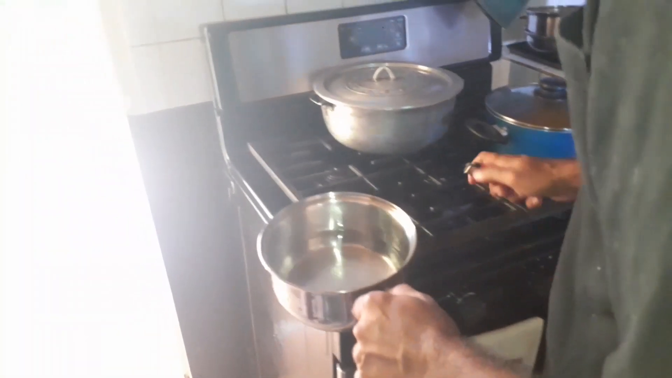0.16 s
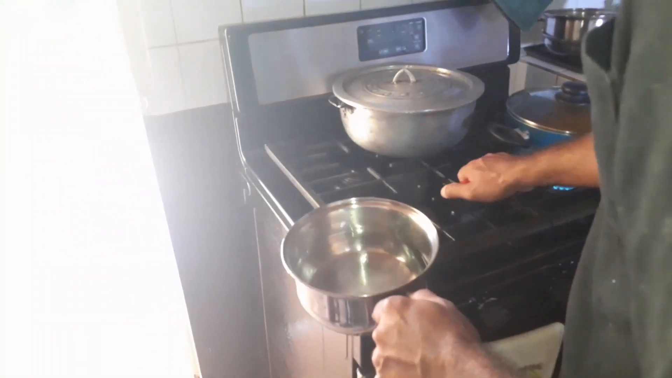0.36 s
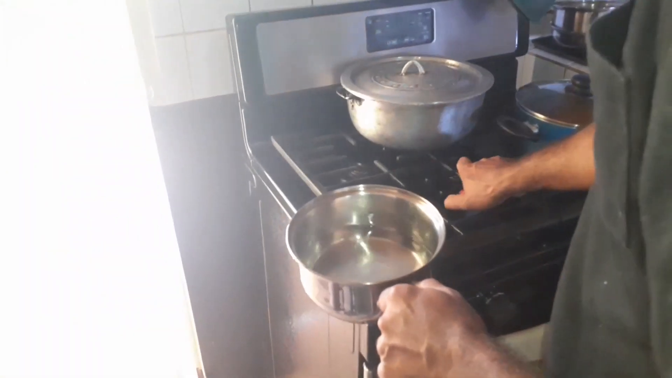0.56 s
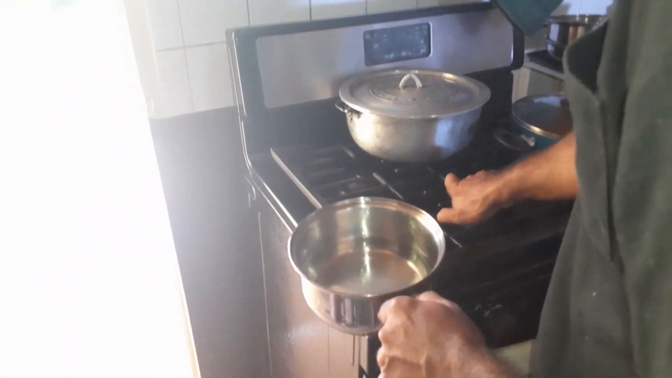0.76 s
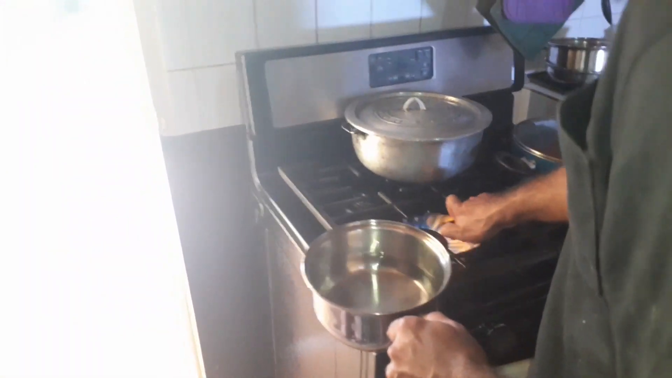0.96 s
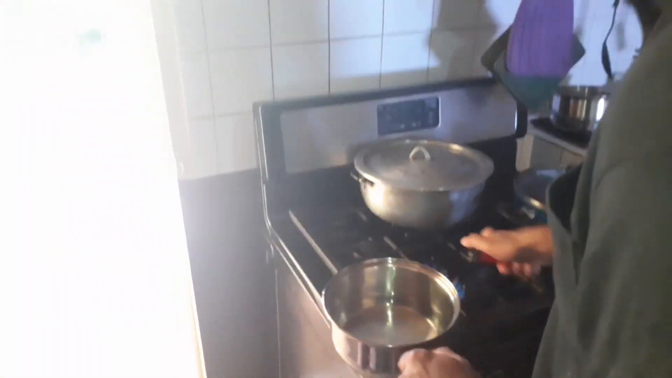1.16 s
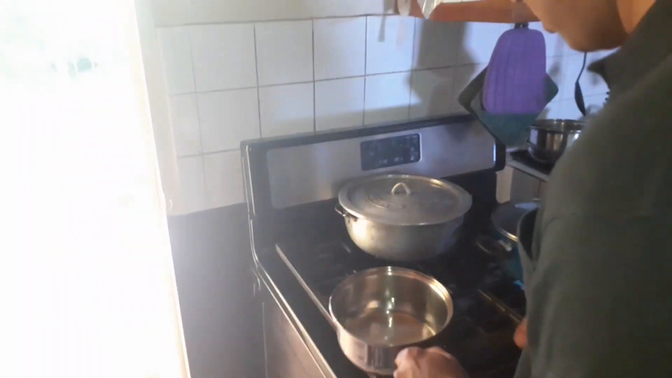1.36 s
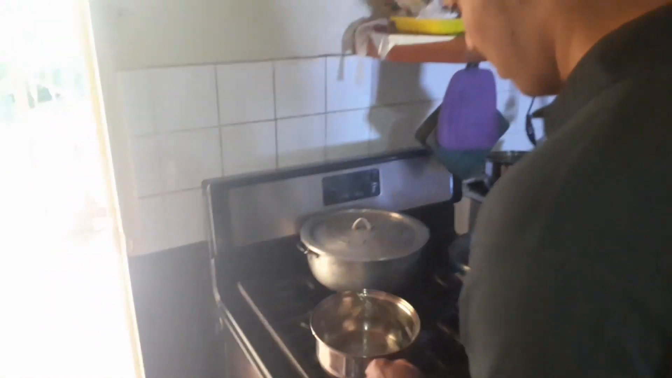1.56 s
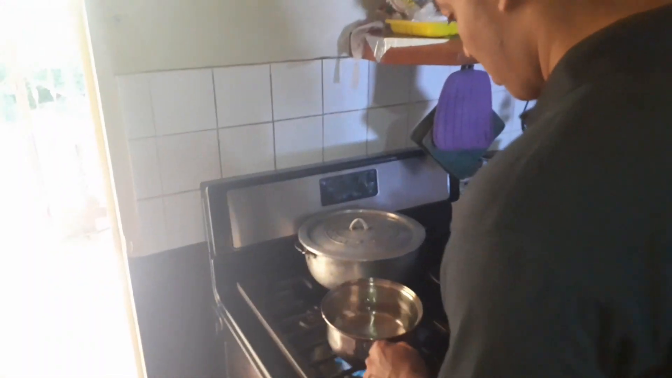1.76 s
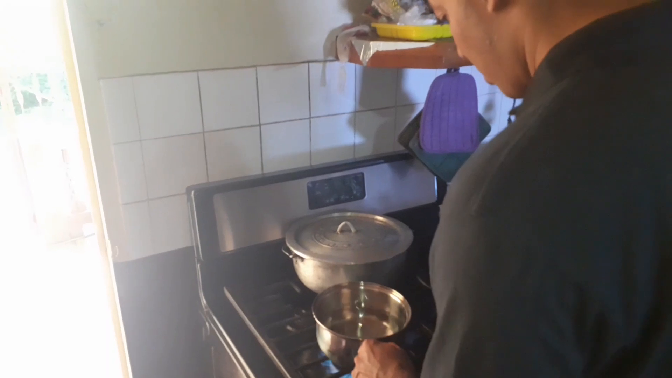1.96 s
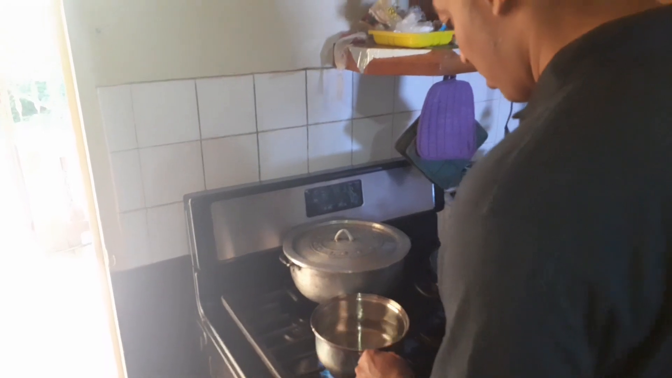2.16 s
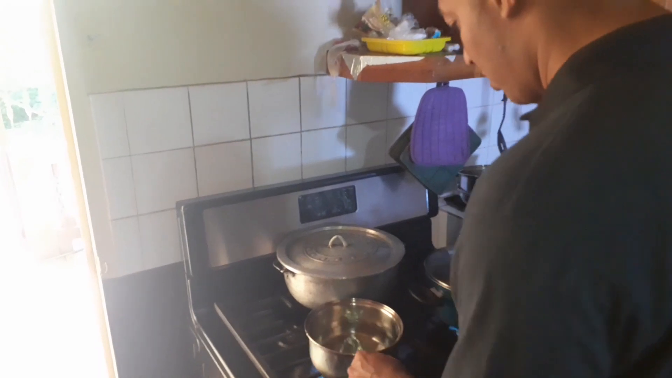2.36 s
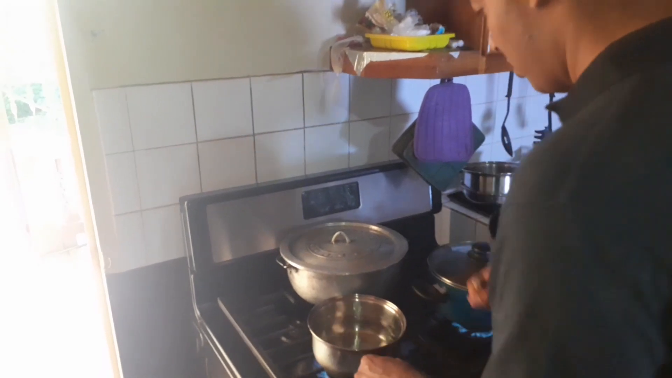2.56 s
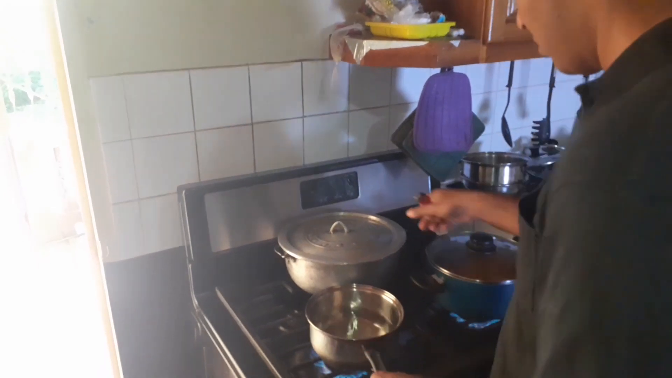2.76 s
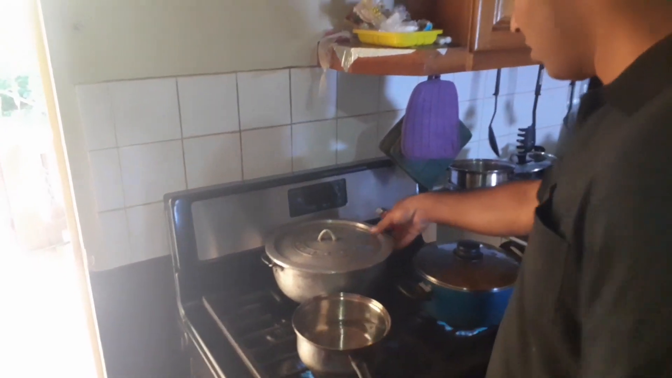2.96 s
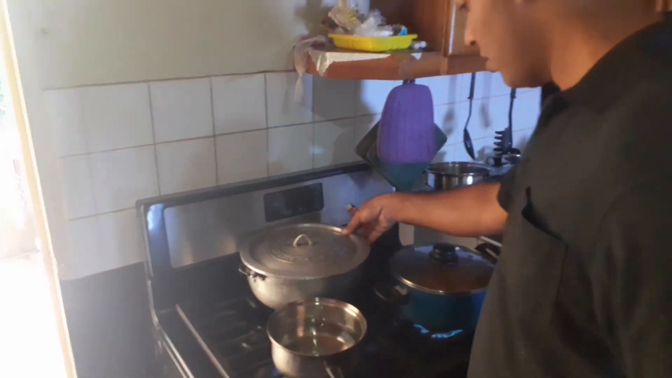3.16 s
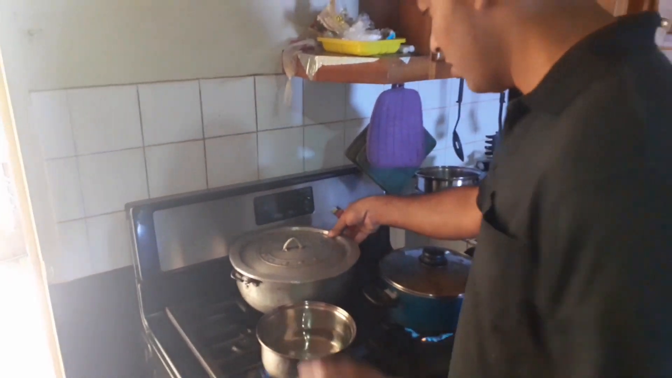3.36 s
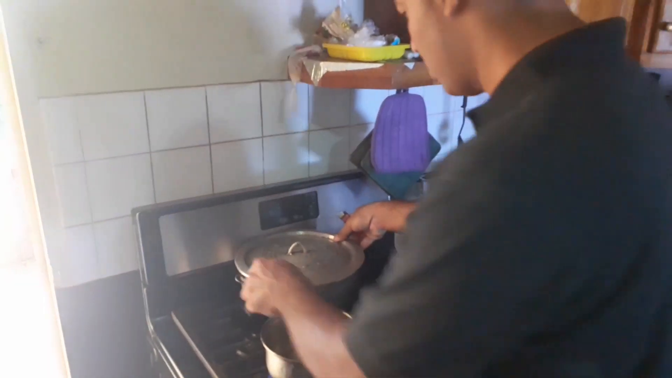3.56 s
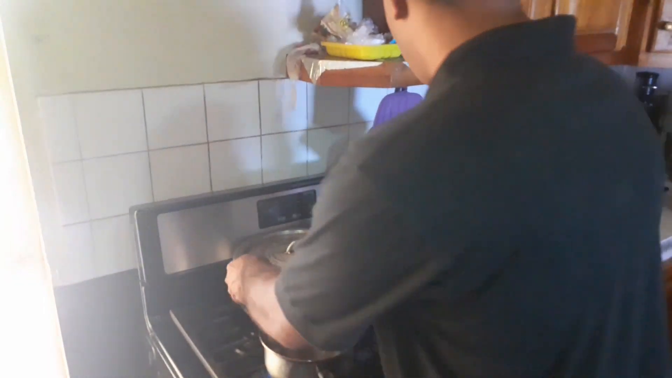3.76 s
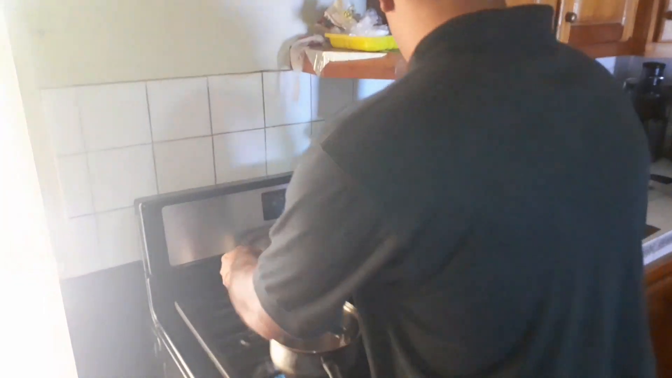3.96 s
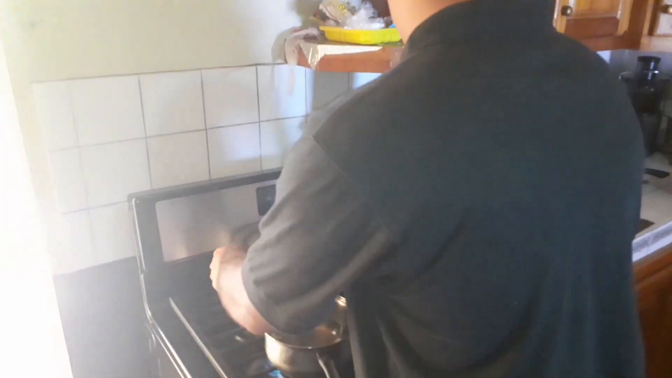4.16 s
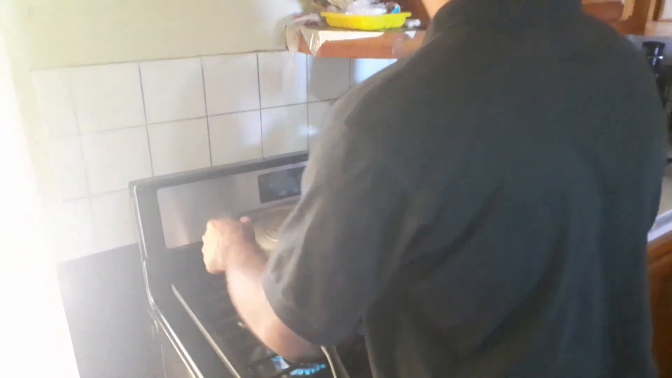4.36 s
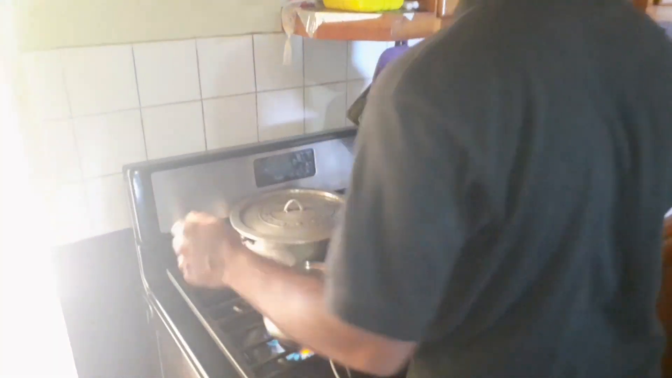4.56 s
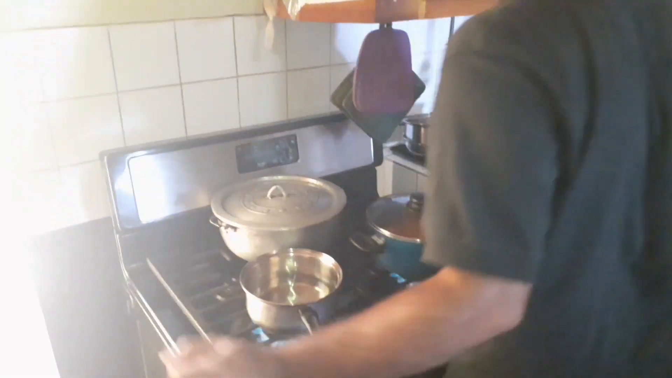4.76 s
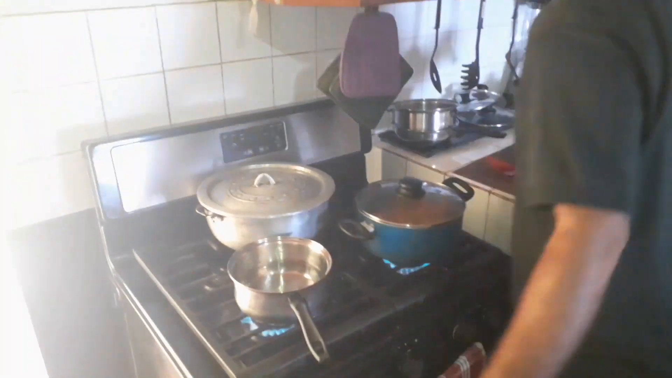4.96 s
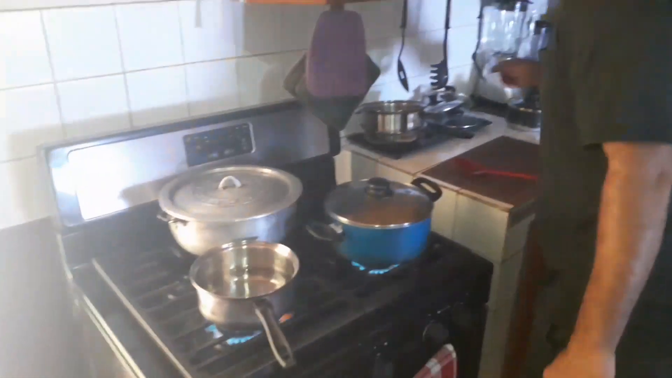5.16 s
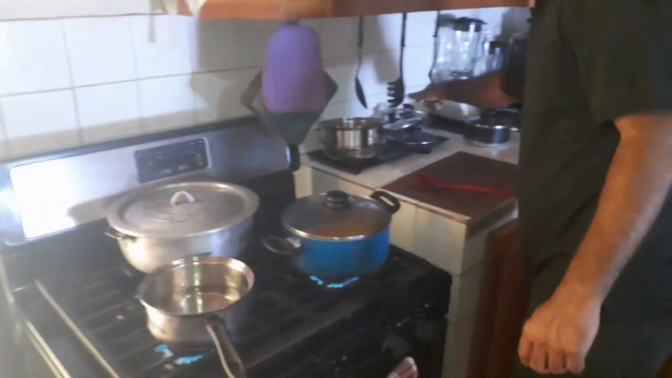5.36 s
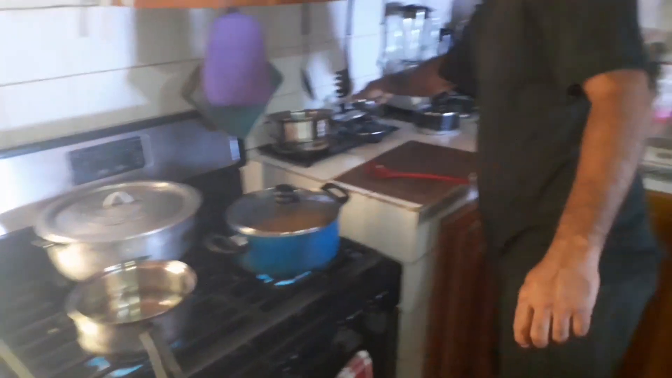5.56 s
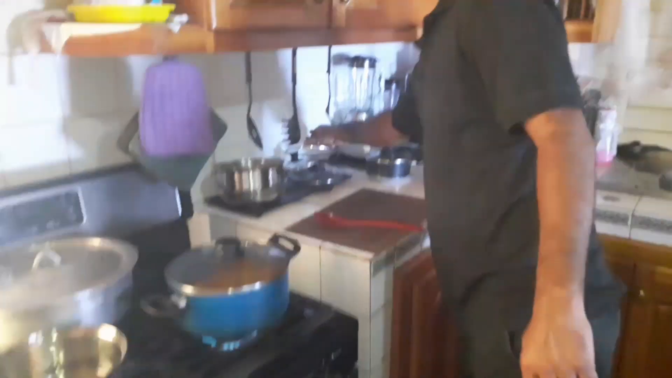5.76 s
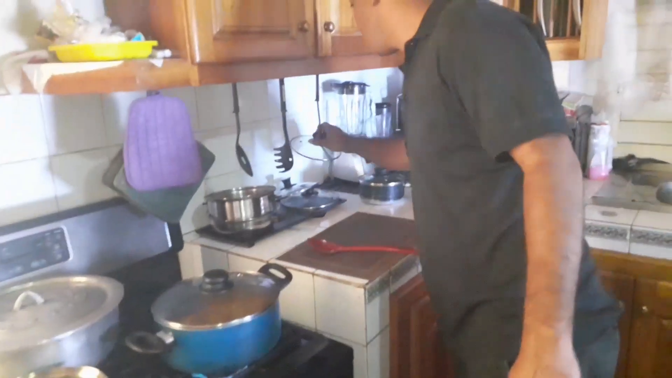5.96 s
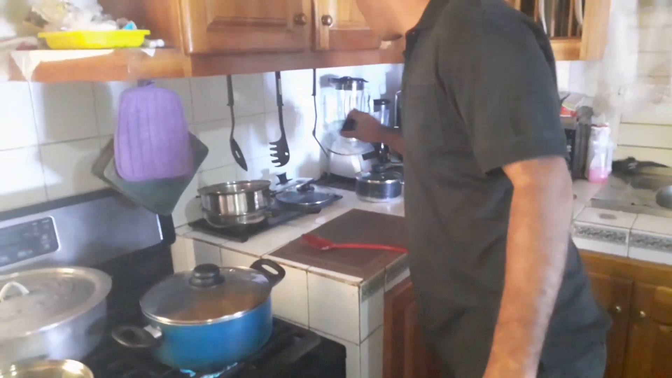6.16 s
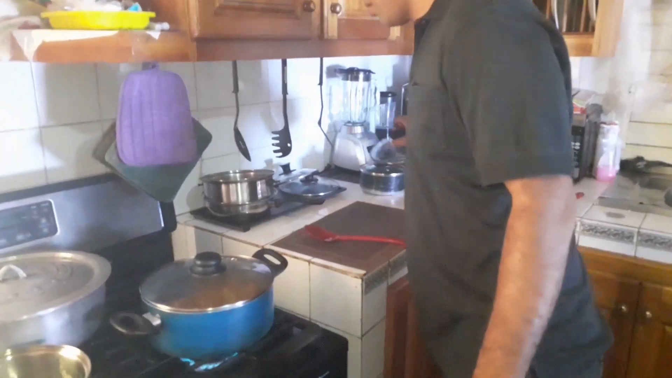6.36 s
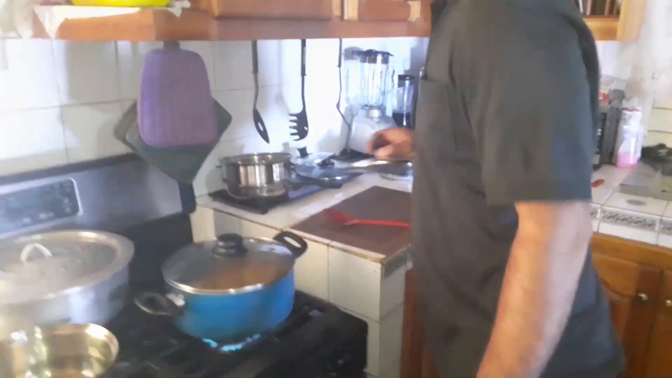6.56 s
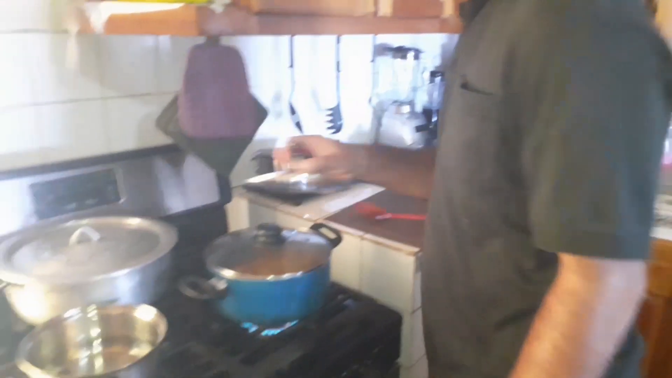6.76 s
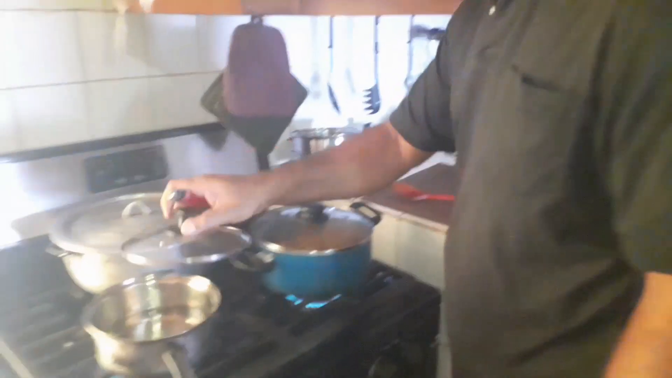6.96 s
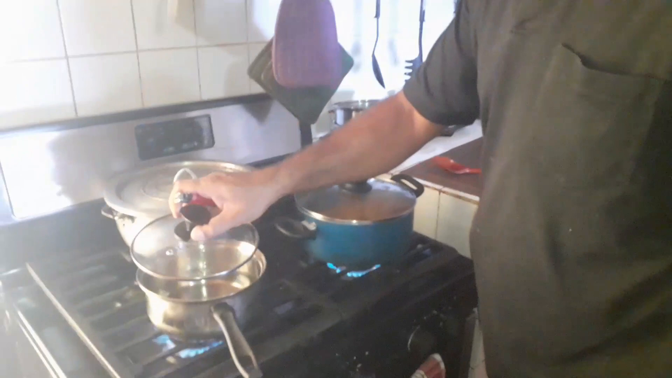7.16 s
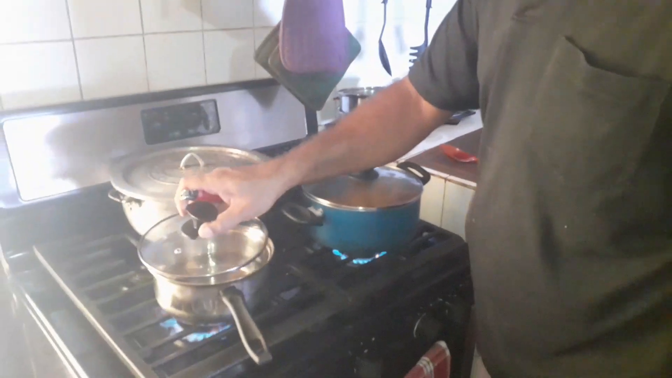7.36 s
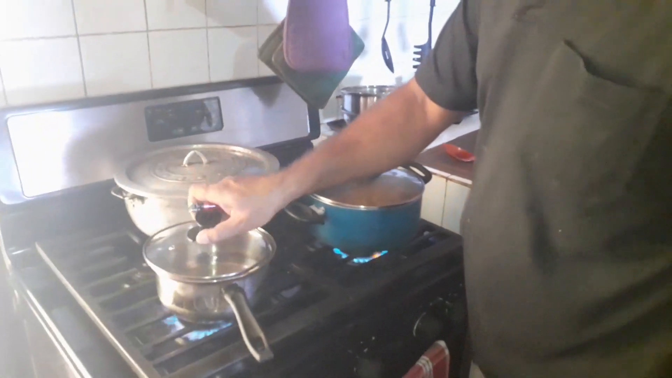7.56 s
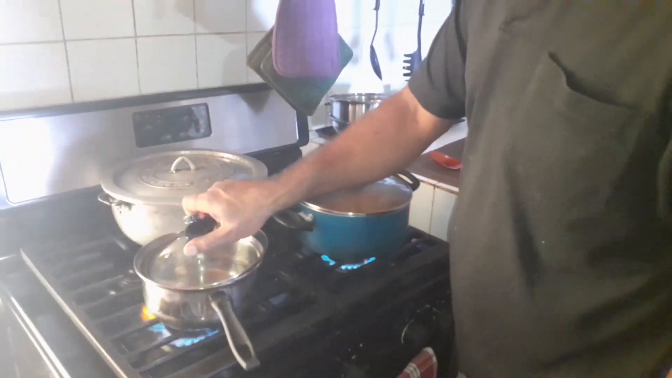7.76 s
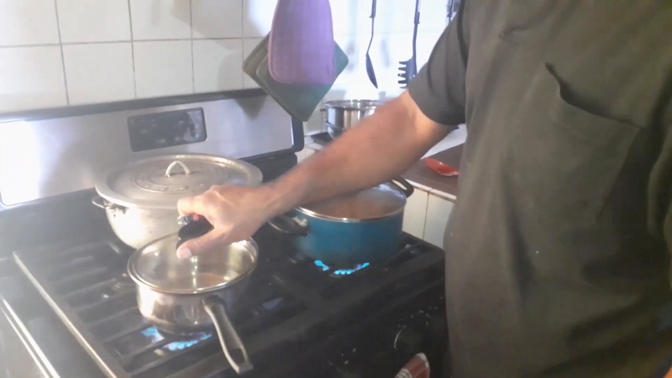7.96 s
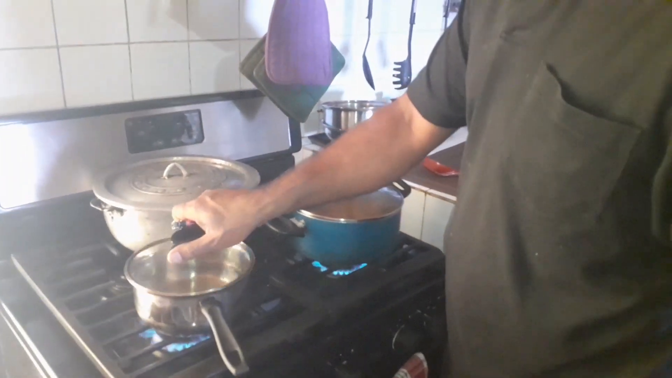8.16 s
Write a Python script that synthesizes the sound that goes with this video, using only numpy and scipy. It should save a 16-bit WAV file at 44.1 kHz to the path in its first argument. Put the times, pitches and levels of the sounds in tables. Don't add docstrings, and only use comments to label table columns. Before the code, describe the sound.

Quiet room murmur, cloth rustle and faint hum lie under sparse kitchen knocks. First a scratchy lighter flick and small gas puff, next a sharp saucepan landing and bright handle clink, then a low pot thud on the grate. Small ticks and a lid clink follow. The loudest moment is a glass lid hitting steel, followed by clattering and a damped, hollow settling, all close with short tiled reflections.

```python
import sys
import numpy as np
from scipy import signal
from scipy.fft import rfft, irfft, next_fast_len
from scipy.io import wavfile
from scipy.ndimage import uniform_filter1d, map_coordinates

SR = 44100
rng = np.random.default_rng(int(sys.argv[2]) if len(sys.argv) > 2 else 0)


def nominal_scale(level):
    x = np.asarray(level, float) / 20
    return 10 ** x


def dump_mix(stems):
    frames = np.atleast_2d(stems).T
    limited = np.clip(frames, -1, 1)
    pcm = np.round(limited * 32767).astype(np.int16)
    wavfile.write(sys.argv[1], SR, pcm)


N = 362502

# frequency in Hz, density in dB per Hz.
FLOOR = [(20, -28), (70, -11.5), (160, -6.5), (210, -1.5), (340, 2.5), (500, -8.5), (850, -9), (1100, -17),
         (3400, -15.5), (5000, -18), (7000, -16), (8800, -20.5), (10200, -34.5), (13000, -24.5)]
# frequency in Hz, density in dB per Hz.
GLASS = [(320, -17), (550, 1.5), (689, -7), (1430, -12), (2980, -13), (3290, -17.5), (7030, -11.5),
         (10400, -22), (15900, -26)]


def unit(x):
    return x / np.sqrt(np.mean(x ** 2) + 1e-20)


def along(points, hz):
    f, v = np.transpose(points)
    return np.interp(np.log(hz + 1), np.log(f + 1), v)


def curves(rows):
    s, *cols = np.transpose(rows)
    return [np.interp(np.arange(N) / SR, s, c) for c in cols]


def filtered(x, response):
    m = next_fast_len(x.shape[-1] + 8192)
    spectrum = rfft(x, m) * response(np.fft.rfftfreq(m, 1 / SR))
    return irfft(spectrum, m)[..., :x.shape[-1]]


def above(hz, edge):
    return 1 / np.sqrt(1 + (edge / (hz + 1)) ** 8)


def between(hz, lo, hi):
    return above(hz, lo) * above(hi, hz)


def swell(s, hold, db, rise, fall, size=32):
    t = np.arange(0, N, size) / SR - s
    slope = np.maximum(-t / rise, (t - abs(hold)) / fall)
    return np.repeat(nominal_scale(db - 60 * np.maximum(slope, 0)), size)[:N]


def alike(pair, colour):
    # frequency in Hz, likeness from 0 to 1.
    likeness = [(60, 1), (130, 0.94), (290, 0.84), (640, 0.55), (1410, 0.016), (3100, 0.044), (6820, 0.01),
                (15000, 0.08)]

    def mixing(hz):
        angle = np.arccos(np.clip(along(likeness, hz), 0, 1)) / 2
        return colour(hz) * np.array([np.cos(angle), np.sin(angle)])

    mid, side = filtered(pair, mixing)
    return np.array([mid + side, mid - side])


def ports(balance, lead):
    side = np.array([[.5], [-.5]])

    def response(hz):
        pair = nominal_scale(side * along(balance, hz)) * np.exp(1j * side * along(lead, hz))
        return pair / np.sqrt(abs(pair.mean(0)) ** 2 + 0.35)

    return response


def add(out, s, sound):
    # frequency in Hz, T60 in seconds.
    kitchen = [(100, 0.65), (500, 0.43), (3000, 0.41), (12000, 0.19)]
    hz, t, z = signal.stft(rng.standard_normal((2, SR // 3)), SR, nperseg=256)
    tail = signal.istft(z * nominal_scale(-60 * t / along(kitchen, hz)[:, None]), SR, nperseg=256)[1]
    tail = alike(tail, np.ones_like)
    wet = signal.fftconvolve(sound[None], tail / np.linalg.norm(tail[0]), axes=1)
    wet = nominal_scale(0.5) * np.roll(wet, 150, axis=1)
    wet[:, :len(sound)] += sound
    part = out[:, round(s * SR):][:, :wet.shape[1]]
    part += wet[:, :part.shape[1]]


def ringing(modes, t, rise, damping=0.54, shaken=1):
    shake_rad, shake_per_khz, beat_db = .22, .16, 4.5
    hz, db, t60 = np.transpose(modes)[:, :, None]
    steps, beats = rng.standard_normal((2, len(modes), 40))
    joined = np.maximum(1 - abs(39 * t / t[-1] - np.arange(40)[:, None]), 0)
    drift = shaken * (shake_rad + shake_per_khz * hz / 1000) * np.cumsum(steps, axis=1) @ joined
    level_db = db + beat_db * beats @ joined - 60 * t / np.clip(damping * t60, .02, .48)
    phase = 2 * np.pi * hz * t + drift
    tones = nominal_scale(level_db.astype("float32")) * np.sin(phase.astype("float32"))
    return tones.sum(0) * (1 - np.exp(-t / rise))


def contacts(out, events, spectrum, modes, ring_db, rise, clang_db, sizzle_db, thud_db=0, follows=0.3, damping=0.78):
    edges_hz = (600, 3000, 9500)
    # frequency in Hz, density in dB per Hz.
    stove = [(29, -48), (90, -22), (156, -22.5), (215, -1), (289, -10.5), (323, -0.5), (700, -20.5),
             (910, -50), (1540, -120)]
    t, edges = np.arange(SR // 3) / SR, (1, *edges_hz, SR)
    bodies = [stove, spectrum, spectrum, spectrum]
    struck = 2.8 * rng.random((len(events), len(modes), 1)) ** 2

    def colour(hz):
        bunched = 1
        for k, (centre, _, _) in enumerate(modes):
            bunched = bunched + struck[:, k, None] / (1 + ((hz - centre) / (25 + .006 * centre)) ** 2)
        bands = [nominal_scale(along(b, hz)) * between(hz, *edges[k:k + 2]) for k, b in enumerate(bodies)]
        return bunched * np.array(bands)

    noise = filtered(rng.standard_normal((len(events), len(bodies), len(t))), colour)
    knocks = rng.exponential(size=(len(events), 1, len(t) // 70 + 1))
    noise[:, 1:] *= nominal_scale(2.07 * np.repeat(knocks, 70, axis=2)[..., :len(t)])
    for (s, db, weight_db, t60), bands in zip(events, noise):
        level = np.array([[thud_db + weight_db], [clang_db + follows * weight_db], [0], [sizzle_db]]) - 2.0
        lasting = max(t60, .01) * np.array([[1.6], [1.2], [1], [.8]])
        rattle = (bands / bands.std(1, keepdims=True) * nominal_scale(level - 60 * t / lasting)).sum(0)
        blow = rattle * (1 - np.exp(-t / rise))
        if modes:
            blow = blow + nominal_scale(ring_db) * ringing(modes, t, rise, damping)
        add(out, s - rise, nominal_scale(db) * blow)


def refrigerator():
    # shaft order, rms level in dB, left-right difference in dB.
    orders = [(2, -60, -5), (3, -68.5, -5.5), (6, -49.5, -5)]
    shaft_hz, mains_hz, in_step_s = 49.3, 100.13, -.08
    t = np.arange(N) / SR - in_step_s
    lines = [(shaft_hz * k, db, lr) for k, db, lr in orders] + [(mains_hz, -58.3, -6)]
    hum = 0
    for hz, db, lr in lines:
        hum = hum + nominal_scale([[db + lr / 2], [db - lr / 2]]) * np.sqrt(2) * np.sin(2 * np.pi * hz * t)
    return hum


def rush(spectrum, bands, patchy_db):
    # frequency in Hz, left-right difference in dB.
    balance = [(60, -18), (110, -3), (200, -2), (380, -5), (700, -3.5), (1290, -7.5), (2380, -8),
               (4400, -16), (8120, -23.5), (15000, -2)]
    z = signal.stft(rng.standard_normal((2, N)), nperseg=512)[2]
    field = uniform_filter1d(uniform_filter1d(rng.standard_normal(z.shape[1:]), 6, 0), 12, 1)
    pair = signal.istft(z * nominal_scale(patchy_db * unit(field)), nperseg=512)[1][:, :N]
    pair = alike(pair, lambda hz: nominal_scale(along(spectrum, hz)))
    heard = ports(balance, [(0, 0.0038)])
    return [unit(filtered(pair, lambda hz: between(hz, lo, hi) * heard(hz))) for lo, hi in bands]


def air():
    # start in seconds, hold in seconds, shuffle in dB over the floor, cloth in
    # dB # relative to the shuffle.
    stirs = [(0.585, .02, -12, 4), (0.924, 0.016, 10, -15), (1.375, 0.59, -29, 13), (1.836, 0.014, -37, 22),
             (2.276, 0.013, 8.5, -11), (2.477, 0.022, -26, 17), (3.115, 0.26, -3, -1),
             (4.065, 0.017, -14, -9), (4.976, 0.12, -19.5, 20.5), (5.49, .02, -4, 3),
             (5.83, 0.012, -9.5, 16), (6.02, 0.89, -9, 4.5), (6.307, 0.024, -8.5, -2),
             (7.195, 0.13, 9, -4.5)]
    moves = np.array([swell(s, hold, db, rise=0.42, fall=0.59) for s, hold, db, _ in stirs])
    shuffle = 1 + moves.sum(0)
    cloth = 1 + nominal_scale([row[3] for row in stirs]) @ moves
    murmur, rustle, hiss = rush(FLOOR, [(1, 1540), (1350, 2700), (5200, SR)], patchy_db=1.5)
    return nominal_scale(-54) * shuffle * murmur + cloth * (nominal_scale(-66.5) * rustle + nominal_scale(-58) * hiss)


def clinks(out):
    # start in seconds, peak in dB, frequency in Hz, T60 in seconds.
    faint = [(0.559, -41.5, 4500, 0.05), (0.752, -50.5, 1320, 0.13), (1.355, -50, 3470, 0.042),
             (1.352, -40.5, 7000, 0.063), (2.153, -37.5, 108, 0.39), (3.539, -36, 14100, 0.042),
             (3.542, -38.5, 7800, 0.046), (3.542, -44.5, 1880, 0.16), (3.880, -22, 230, 0.11),
             (3.899, -36.5, 110, 0.25), (4.82, -43.5, 600, 0.19), (4.96, -46, 70, 0.36),
             (5.3, -55, 1920, 0.12), (6.014, -40, 1010, 0.093), (6.27, -46, 695, 0.16),
             (6.673, -23, 2260, 0.019), (2.067, -52.5, 3080, 0.06), (6.923, -39, 7900, 0.079),
             (7.068, -27, 8300, 0.034), (3.881, -47, 2500, .04), (1.769, -52.5, 1330, 0.074)]
    t = np.arange(SR // 3) / SR
    for s, db, centre, t60 in faint:
        spread = 32 + 0.0079 * centre / t60
        rise = 0.003 + 2.2 / centre
        band = filtered(rng.standard_normal(len(t)), lambda hz: np.exp(-((hz - centre) / spread) ** 2 / 2))
        envelope = nominal_scale(db + 1.5 - 60 * t / (0.9 * t60)) * (1 - np.exp(-t / rise))
        add(out, s, unit(band) * envelope)


def lighter(out):
    # start in seconds, bright peak in dB, thud in dB relative to it, T60 in seconds.
    flicks = [
        (0.825, -36.5, -16, 0.12),
        (0.8358, -23, -19.5, 0.06),
        (0.8727, -42, 13, 0.059),
        (0.914, -52, 13, 0.042),
        (0.9416, -40.5, 17, 0.028),
    ]
    # frequency in Hz, density in dB per Hz.
    flint = [(320, -24), (550, -10), (793, -14), (2340, -16), (7030, -2), (10400, -6), (15900, 7)]
    modes = [(6000, -6, .05), (7000, 0, .08), (7750, -1, 0.092)]
    contacts(out, flicks, flint, modes, ring_db=-16, rise=0.004, clang_db=-5.0, sizzle_db=-7)


def burner():
    # start in seconds, hold in seconds, level in dB.
    puffs = [
        (0.9, 0.055, -37),
        (1.028, 0.034, -41),
    ]
    flutter = map_coordinates(rng.standard_normal(N // 900 + 4), [np.arange(N) / 900])
    gain = sum(swell(*puff, rise=0.083, fall=0.093) for puff in puffs)
    roar = filtered(nominal_scale(2.6 * flutter) * rng.standard_normal(N), lambda hz: between(hz, 100, 360))
    return gain * unit(roar) * nominal_scale([[-6], [-.6]])


def saucepan(out):
    # start in seconds, bright peak in dB, thud in dB relative to it,
    # T60 in seconds.
    blows = [
        (2.1125, -18.5, -9, 0.05),
        (2.1314, -33.5, 8.5, 0.058),
        (2.1495, -49, -1, 0.11),
        (2.1632, -37, 12, 0.1),
        (2.1983, -43.5, -11, 0.26),
        (2.298, -45.5, 6, 0.054),
    ]
    handle_blow = [
        (2.4131, -24.5, -32, 0.059),
    ]
    # frequency in Hz, density in dB per Hz.
    steel = [(320, -32), (550, 3.5), (793, 1), (1700, -2.5), (3150, -26), (4060, -32), (4940, -13.5),
             (8800, -21), (9990, -41), (15900, -31)]
    grip = [(880, -50), (1500, -22), (2360, -34), (2610, -6), (3500, -10), (6730, 9), (8970, -11),
            (10700, -15), (15900, -17)]
    # frequency in Hz, level in dB, T60 in seconds.
    pan_modes = [(217.2, 3.5, 0.8), (402, -6.5, 0.44), (786, -2, 0.86), (992, -4, 0.34), (1648, 1.5, 0.35),
                 (2260, -9, .3), (2870, -19, .3), (3470, -15.5, 0.36), (4950, -0.5, 0.14),
                 (5750, -13, 0.31), (6230, -9, 0.26), (6670, 6.5, 0.14), (7000, -15, .3), (8600, -9, 0.25)]
    handle_modes = [(2563, -6, 0.78), (2690, -6.5, 2.0), (2914, -10, 0.35), (4630, -7, 0.18),
                    (5346, -10, 0.88), (5800, -3, .6), (6150, 16, 0.37), (6560, 0, 0.31), (7000, 2, .12),
                    (7348, -10, .6), (7930, 4, .5), (8800, 5.5, 0.35), (8900, 0, 0.34), (9800, -12, .25)]
    contacts(out, blows, steel, pan_modes, ring_db=-19.5, rise=0.0039, clang_db=-1.7, sizzle_db=-30)
    contacts(out, handle_blow, grip, handle_modes, ring_db=-21.0, rise=0.0043, clang_db=-13, sizzle_db=1.0,
             damping=0.39)


def ticks(out):
    # start in seconds, bright peak in dB, thud in dB relative to it, T60 in seconds.
    taps = [(3.746, -38.5, -7, 0.02), (5.0744, -41.5, -6, 0.052), (5.5139, -39, 5.5, 0.035),
            (5.559, -36, -18, 0.032), (6.4744, -41, 1, 0.09), (6.6742, -38, 3, 0.033),
            (6.8096, -45, -13, 0.054), (6.925, -44.5, 1, 0.089)]
    contacts(out, taps, FLOOR, [], ring_db=-9, rise=0.0021, clang_db=-3.0, sizzle_db=-7, thud_db=-8, follows=1)


def pot(out):
    # start in seconds, bright peak in dB, thud in dB relative to it,
    # T60 in seconds.
    jolts = [
        (3.8792, -34.5, 7.8, 0.028),
        (3.8846, -37.5, 13, 0.034),
        (3.9001, -43, 5.3, 0.12),
    ]
    blows = [
        (3.956, -30.5, 3.5, 0.029),
        (3.9615, -33.5, 1, 0.036),
        (4.028, -59, 26, 0.042),
    ]
    # frequency in Hz, density in dB per Hz.
    aluminium = [(320, -30), (550, 10.5), (1130, -7), (1300, -3), (2340, -7), (3800, -19.5), (6800, -16),
                 (9600, -34), (15900, -50)]
    # frequency in Hz, level in dB, T60 in seconds.
    grate_modes = [(211.6, 16.5, 0.31), (842, 9, .1), (1280, -16, .2), (1440, -9, .2), (2280, -16, .2),
                   (1760, -10, 0.1)]
    pot_modes = [(416, 8.5, 0.32), (820, -2, 0.25), (1280, 2, 0.17), (1735, -2.5, 0.2), (2080, -0.5, 0.16),
                 (2995, -5, 0.22), (3700, -17, .15), (4370, -14, 0.15), (5300, -15, 0.2), (6500, -27, .25),
                 (7580, -23, 0.4), (8070, -22, .2), (8850, -19, 0.3)]
    contacts(out, jolts, aluminium, grate_modes, ring_db=-13.0, rise=0.0022, clang_db=3.0, sizzle_db=-42)
    contacts(out, blows, aluminium, pot_modes, ring_db=-8, rise=0.00108, clang_db=0.0, sizzle_db=-40, damping=0.31)


def squeak(out):
    # time in seconds, frequency in Hz, level in dB.
    glide = [
        (5.45, 1947, -45),
        (5.501, 1754, -52),
        (5.56, 1670, -64),
        (5.59, 2030, -53),
        (5.67, 2140, -71),
    ]
    start, end = glide[0][0], glide[-1][0]
    part = slice(round(start * SR), round(end * SR))
    hz, db = (c[part] for c in curves(glide))
    phase = np.cumsum(2 * np.pi * hz / SR + 0.057 * rng.standard_normal(len(hz)))
    add(out, start, nominal_scale(db + 1.5) * np.sin(phase) * signal.windows.tukey(len(hz), .2))


def stacked_lids(out):
    # start in seconds, bright peak in dB, thud in dB relative to it, T60 in seconds.
    blows = [
        (5.7638, -25, -31, 0.056),
        (5.7894, -35.5, -9, 0.063),
        (5.8321, -43, -16, 0.087),
    ]
    # frequency in Hz, density in dB per Hz.
    lids = [(320, 30), (550, 23), (1650, 4), (3240, -21), (4170, -11.5), (8090, -18.5), (9850, -43),
            (15900, -39)]
    # frequency in Hz, level in dB, T60 in seconds.
    modes = [(820, -10, .2), (1204, -3, 0.68), (1280, -13, 0.26), (1607, -12, .15), (2240, -2, 0.32),
             (2480, 0, 0.23), (3490, -1, 0.4), (4180, 4, 0.25), (5170, -2, 0.18), (4950, -13, .2),
             (6060, -20, .3), (7224, -20, .3), (8200, -20, .3), (14070, -20, .14)]
    contacts(out, blows, lids, modes, ring_db=-19.0, rise=0.00144, clang_db=8.0, sizzle_db=-6.5)


def pings():
    # start in seconds, level in dB, frequency in Hz, T60 in seconds.
    rims = [(5.98, -46, 3110, .07), (6.483, -37.5, 1284, 0.2), (6.81, -51, 886, 0.33),
            (6.81, -50, 4300, .15), (6.675, -48, 2190, .3), (6.93, -50, 2190, 0.34),
            (7.953, -46.5, 3180, 0.38), (7.985, -40, 820, 0.21)]
    out, t = np.zeros(N + SR), np.arange(SR // 4) / SR
    for s, db, hz, t60 in rims:
        out[round(s * SR):][:len(t)] += ringing([(hz, db, t60)], t, .004, damping=1, shaken=1.5)
    return out[:N]


def lid_knock(out):
    # start in seconds, bright peak in dB, thud in dB relative to it, T60 in seconds.
    blows = [
        (7.073, -10, -4, 0.054),
        (7.0809, -8.5, -24, 0.062),
        (7.0897, -14.5, -2, 0.044),
        (7.1115, -26, -5, 0.036),
        (7.179, -27.5, -6, 0.065),
    ]
    # frequency in Hz, density in dB per Hz.
    rim = [(320, -67), (550, -13), (719, -16), (804, 1.5), (1020, -15), (1450, -8.5), (1850, -9),
           (4000, -5), (7650, -2), (9850, -13), (15900, -15)]
    # frequency in Hz, level in dB, T60 in seconds.
    pan_modes = [(212, 4.5, 0.26), (321, -11, 0.25), (805, -4, 0.6), (1310, -2.5, 0.27), (1381, -9, 0.24),
                 (1505, -21, 0.22), (2190, -13, 0.48), (2345, -8, 0.2), (2910, -13, 0.53), (3040, -16, 0.4),
                 (3960, -5.5, 0.45), (5210, -11, 0.3), (5600, -9, 0.56), (5973, -16, 0.2)]
    glass_modes = [(1985, -9, 0.57), (2620, -20, .4), (1039, -16, 0.6), (4360, -15, 0.48), (4920, -25, .3),
                   (6309, -17, .2), (6530, -17, 0.47), (7500, -9, 0.36), (8100, -13, 0.4), (8800, -6, 0.29),
                   (11450, -30, 0.18), (12800, -25, .2), (14000, -8, .1), (15220, -24, .15)]
    contacts(out, blows, rim, pan_modes + glass_modes, ring_db=-20.5, rise=.004, clang_db=4.5, sizzle_db=-8.0,
             damping=0.88)


def lid_landing(out):
    # start in seconds, bright peak in dB,
    # thud in dB relative to it, T60 in seconds.
    landings = [(7.5208, -34, -12, .03), (7.5226, -10.5, -15, 0.025), (7.5271, -15, -5.5, 0.038),
                (7.5356, -21, -1.5, 0.12), (7.592, -21.5, -18, 0.055), (7.6040, -18.5, -1.5, 0.047),
                (7.555, -23, -9, 0.031), (7.622, -36, -14, 0.028), (7.65, -41, -15, .06)]
    rattles = [
        (7.6944, -28.5, -41, 0.11),
        (7.7288, -25, -8, 0.069),
        (7.7400, -20.5, -2, 0.079),
        (7.765, -19.5, -12, 0.055),
        (7.7883, -21, -3, 0.056),
        (7.81, -35, -7, 0.039),
        (7.85, -50, -2, 0.088),
    ]
    settlings = [
        (8.1214, -32.5, -27, 0.082),
        (8.1493, -30.5, 9, 0.077),
        (8.2064, -29.5, -14, 0.11),
    ]
    # frequency in Hz, level in dB,
    # T60 in seconds.
    landing_modes = [(582.4, 0.5, 0.9), (850, -10, 0.2), (1552, -10, 0.13), (1753, -8, 0.2),
                     (2570, -7, 0.3), (2950, -6.5, 0.65), (3450, -18, .3), (3840, -15, .2),
                     (4170, -9, 0.18), (4600, -16, .12), (5000, -16, 0.14), (6600, -10, 0.18),
                     (7180, 2, .1), (9000, -14, .2)]
    rattle_modes = [(578, 0.5, 0.6), (1376, -7, 0.22), (1490, -1, 0.16), (2210, -5, 0.37), (2500, -14, .2),
                    (2850, -8.5, 0.25), (4230, -15, 0.12), (4580, -14, 0.12), (6800, -15, 0.13),
                    (7300, -18, 0.2), (8100, -6, 0.1), (8500, 0, 0.11)]
    settled_modes = [(950, 6, 0.067), (1250, -11, .4), (2700, -17, .3), (3820, 6.5, 0.17), (4930, 4, 0.17),
                     (5800, -7, .1), (6700, -15, .25), (7300, -7, .08)]
    edge_modes = [(10300, -30, .2), (12000, -24, .15), (12600, -17, .15), (13480, -14, 0.16),
                  (13600, -18, .12), (14750, -16, .12), (14950, -13, .12)]
    contacts(out, landings, GLASS, landing_modes + edge_modes, ring_db=-19, rise=0.0011, clang_db=-4.5,
             sizzle_db=-46)
    contacts(out, rattles, GLASS, rattle_modes + edge_modes, ring_db=-13.5, rise=0.0027, clang_db=1.5,
             sizzle_db=-7.5)
    contacts(out, settlings, GLASS, settled_modes + edge_modes, ring_db=-15.5, rise=0.001505, clang_db=2.0,
             sizzle_db=-3.5)


def seating():
    # time in seconds, air push in dB, grind in dB.
    rocks = [(7.532, -29, -50), (7.66, -46, -31), (7.702, -21, -51), (7.743, -19, -39), (7.8, -58, -51),
             (7.89, -28.5, -48), (7.963, -38, -46.5), (8.156, -24.5, -32), (8.176, -35, -56),
             (8.21, -40, -42)]
    # frequency in Hz, width in Hz, level in dB.
    air_modes = [(355, 78, -6), (560, 37, -30), (787, 28, -14.5)]
    push = sum(swell(s, 0, db, rise=0.081, fall=0.26) for s, db, _ in rocks)
    rub = sum(swell(s, 0, db, rise=0.081, fall=0.34) for s, _, db in rocks)

    def hollow(hz):
        total = 0
        for k, (centre, width, db) in enumerate(air_modes):
            damped = 1j * hz * width
            total = total + (-1) ** k * nominal_scale(db) * damped / (centre * centre - hz * hz + damped)
        return total ** 2

    def scrape(hz):
        return nominal_scale(along(GLASS, hz)) * (above(hz, 400) + nominal_scale(-26) * above(hz, 9300))

    cavity = unit(filtered(rng.standard_normal(N), hollow))
    chatter = nominal_scale(2.7 * np.repeat(rng.exponential(size=N // 90 + 1), 90)[:N])
    grind = unit(filtered(chatter * rng.standard_normal((2, N)), scrape))
    return nominal_scale(-5.5) * push * cavity + rub * grind


def thumps():
    # start in seconds, level in dB, frequency in Hz, T60 in seconds.
    seatings = [(7.533, -20.5, 335, 0.094), (7.606, -38, 410, 0.098), (7.697, -19.5, 359, 0.14),
                (7.728, -15, 354, 0.15), (7.742, -18, 357, 0.1), (7.745, -18.5, 448.6, 0.33),
                (7.769, -25, 380, 0.2), (7.79, -16, 443, .12), (7.819, -39, 355, .15),
                (7.879, -38, 370, 0.16), (7.911, -35, 350, .1), (8.12, -26, 395, 0.078),
                (8.134, -26, 392, 0.087), (8.151, -15.5, 396.4, 0.2), (8.165, -18.5, 445, 0.17),
                (8.195, -31, 394, .2)]
    out, t = np.zeros(N + SR), np.arange(SR // 4) / SR
    for s, db, hz, t60 in seatings:
        tone = nominal_scale(db - 60 * t / t60) * np.sin(2 * np.pi * hz * t)
        out[round(s * SR):][:len(t)] += tone * (1 - np.exp(-t / 0.0019))
    return out[:N]


def cookware():
    # frequency in Hz, left-right difference in dB.
    balance = [(60, -2.0), (110, -2.5), (200, -3.5), (380, -4.0), (700, -2.5), (1290, -3.0), (2380, -1.5),
               (4400, -6.0), (8120, -16.0), (15000, -4.5)]
    # frequency in Hz, lead in rad.
    lead = [(0, 0), (860, 0.5), (3100, 8.2), (4650, 8.8), (7580, 15.9), (8530, 16.5), (9820, 7.2),
            (12000, -2.1), (12400, -10.3), (13500, -20.5), (15800, -18.8)]
    out = seating() + thumps() + pings()
    for source in (clinks, lighter, saucepan, ticks, pot, squeak, stacked_lids, lid_knock, lid_landing):
        source(out)
    heard = ports(balance, lead)
    return filtered(out, lambda hz: above(hz, 40) * heard(hz))


def scene():
    # time in seconds, extra left-right difference in dB.
    turning = [
        (0, -2),
        (5.6, -1),
        (6.1, 2),
        (8.22, 0.5),
    ]
    # time in seconds, gain in dB.
    gain_control = [
        (0, -0.14),
        (7.07, 1.36),
        (7.5, -3.5),
        (7.6, 1.5),
        (8.22, -0.5),
    ]
    side = np.array([[.5], [-.5]])
    steady_gain = nominal_scale(side * curves(turning)[0] + curves(gain_control)[0])
    return cookware() + burner() + steady_gain * (refrigerator() + air())


def roll_off(x):
    return signal.sosfilt(signal.butter(12, 16710, fs=SR, output="sos"), x)


def record(dry):
    ceiling, top_hz = .93, 15760
    held = dry / (1 + abs(dry / ceiling) ** 6) ** (1 / 6)
    mix = filtered(held, lambda hz: hz < top_hz)
    return roll_off(mix)


dry = scene()
out = record(dry)
dump_mix(out)
```